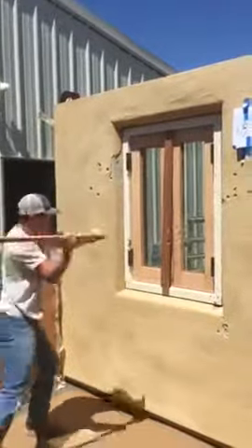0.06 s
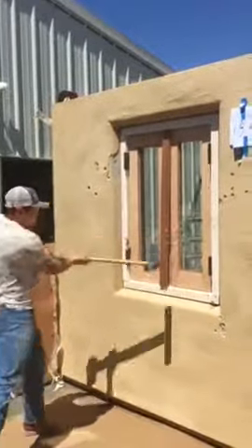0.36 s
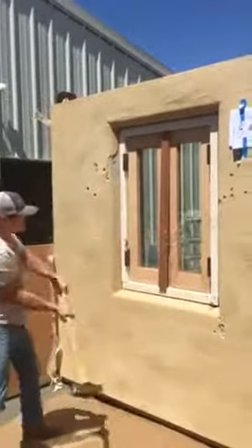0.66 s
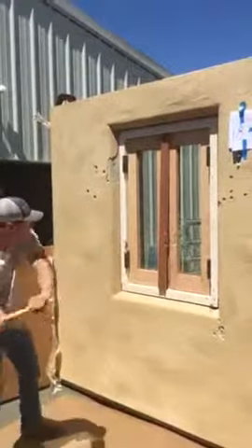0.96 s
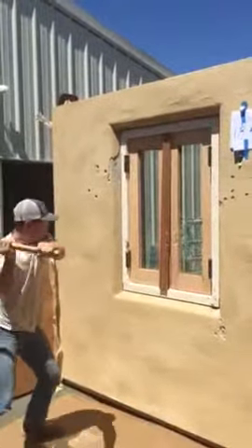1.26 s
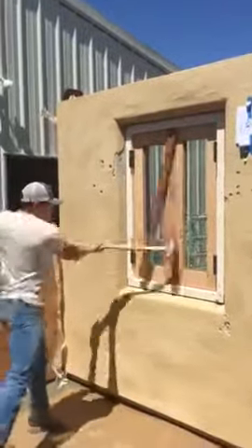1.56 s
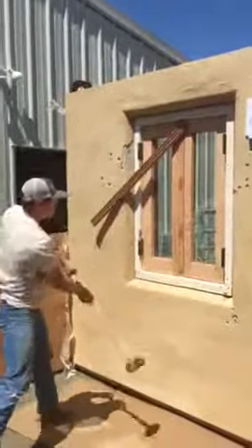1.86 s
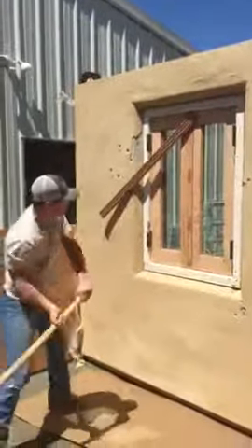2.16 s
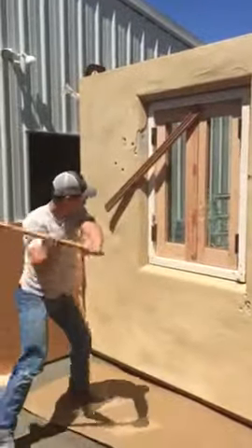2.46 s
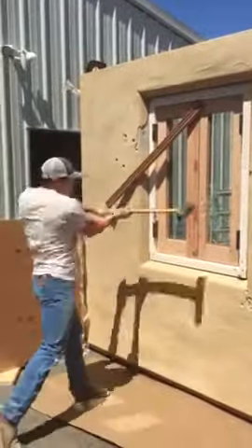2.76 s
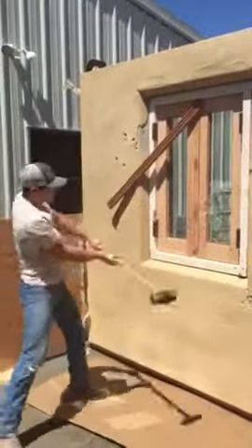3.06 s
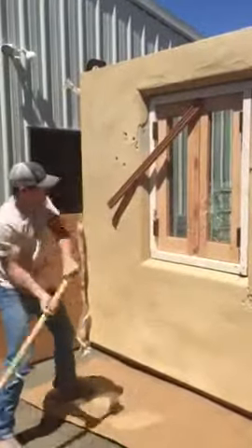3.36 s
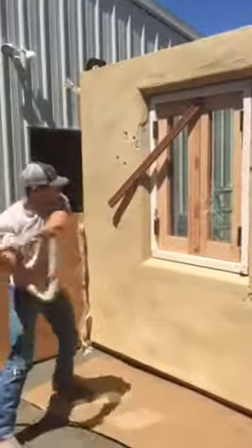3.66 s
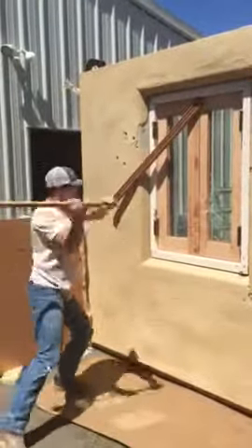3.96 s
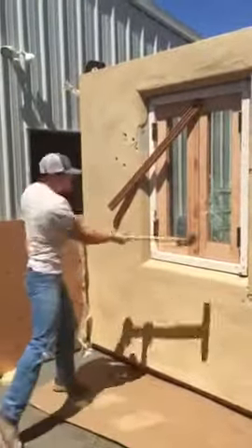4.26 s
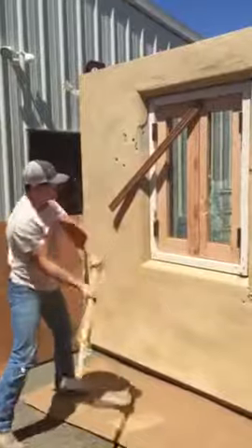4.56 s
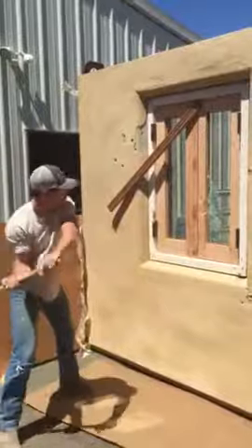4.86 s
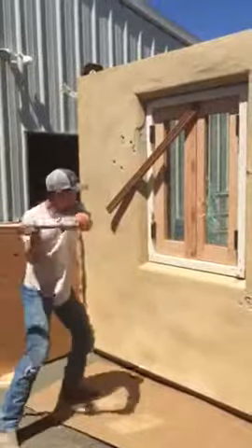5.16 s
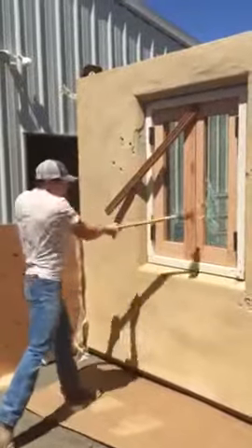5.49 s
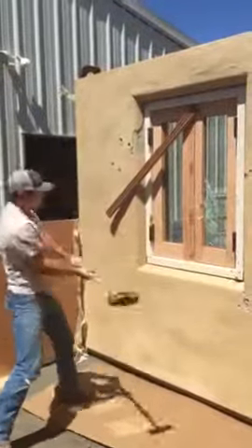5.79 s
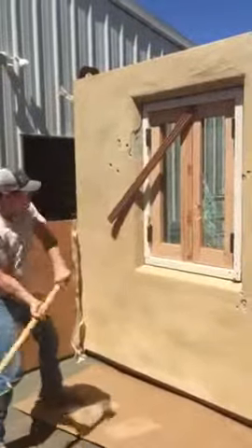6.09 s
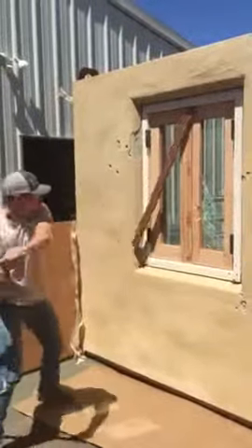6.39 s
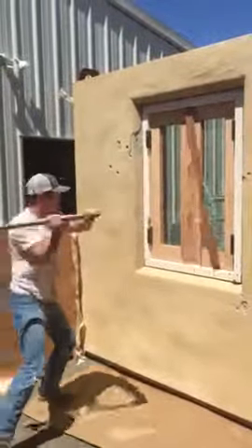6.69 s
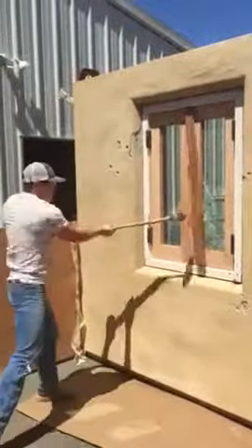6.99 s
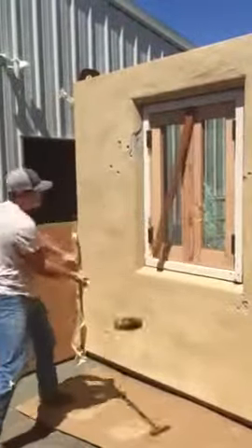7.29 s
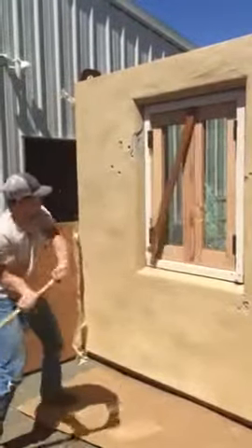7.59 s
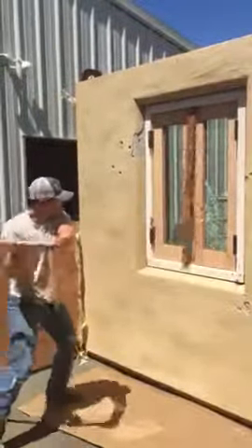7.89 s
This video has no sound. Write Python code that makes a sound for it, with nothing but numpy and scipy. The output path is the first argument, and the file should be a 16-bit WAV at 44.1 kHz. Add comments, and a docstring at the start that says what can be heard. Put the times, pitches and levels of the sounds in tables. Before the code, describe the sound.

Six heavy sledgehammer blows land on a wooden window frame, a little over a second apart, each a deep thud with a sharp crack, a short rattle and a clack of loose timber. The sound ducks for a moment after every loud hit. Shoes knock and scrape on boards and clothing rustles as the hammer is drawn back. Behind it are soft outdoor wind and a faint, far machine hum.

```python
"""Outdoors, a light wind blows, a far machine hums and shoes tap on boards. At 0.3 s a sledgehammer
hits a wooden window in a free-standing wall: the wall booms, the timber cracks, the sashes rattle.
The blow overloads the microphone, so its gain control briefly turns everything down, even wind and hum.
Clothes rustle and shoes tap and scuff between swings, and five more blows land about 1.3 s apart.
Just before the fifth, deeper tones join the hum. The last lands at 7 s; a rustle and a scuff follow."""
import sys
import numpy as np
from scipy import signal
from scipy.fft import rfft, irfft
from scipy.io import wavfile
from scipy.ndimage import minimum_filter1d

SR = 44100
rng = np.random.default_rng(int(sys.argv[2]) if len(sys.argv) > 2 else 0)


def inscribe(sig):
    """Save sig as 16-bit PCM at rate SR to the path in sys.argv[1].

    A 1-D sig is mono; a 2-D sig holds one channel per row.
    Samples are clipped to [-1, 1] before scaling.
    """
    pcm = np.round(np.clip(np.atleast_2d(sig).T, -1, 1) * 32767)
    wavfile.write(sys.argv[1], SR, pcm.astype(np.int16))


N = 350154
TIME = np.arange(N) / SR
RING_TIME = np.arange(int(.6 * SR)) / SR  # seconds since a hit

# Levels set the balance between sounds. A t60 is the time a sound takes to fade by 60 dB.
# strength of the wind on the microphone: t/s, level/dB
WIND_LEVEL = [(0, -32.5), (.3, -32.5), (.95, -41.5), (1.42, -30), (1.65, -40), (2.28, -54), (2.55, -32),
              (2.82, -26.5), (3.1, -36.5), (3.55, -31), (3.85, -33), (4.0, -43), (4.2, -31.5), (4.7, -53),
              (5.4, -39.5), (6.1, -33.5), (6.5, -45.5), (7.9, -40.5)]
# tone of the low rumble of wind and wall: f/Hz, level/dB
RUMBLE_TONE = [(20, -20.5), (35, -7), (55, 5), (85, 4), (130, -1.5), (200, -9), (320, -19.5), (800, -83)]
# slow drift of the soft outdoor noise: t/s, level/dB
OUTDOOR_LEVEL = [(0, -37), (.7, -40), (1.4, -37), (2.0, -40.5), (2.35, -40), (2.7, -37), (4.6, -37),
                 (5.3, -36), (5.9, -34.5), (6.3, -37), (7.9, -37)]
# tone of that outdoor noise: f/Hz, level/dB
OUTDOOR_TONE = [(40, -5), (100, 4), (200, 2), (420, 1), (630, 3.5), (760, 2.5), (950, 1.5), (1700, 1.5),
                (2600, -2.5), (4200, -6), (6000, -13.5), (9000, -18.5), (16000, -19)]
# tones of the far machine: start/s, f/Hz, width/Hz, level/dB
HUM_TONES = [(0, 623, 14, -51.5), (0, 565, 13, -56), (0, 920, 30, -53.5), (0, 2543, 100, -54.5),
             (5.2, 163.7, 84, -43), (5.2, 213.5, 66, -46), (5.2, 336.5, 18, -52.5)]
# swells of rustling, likely clothes: peak time/s, level/dB
RUSTLES = [(-.15, -47), (1.14, -43), (2.42, -47), (3.66, -41.5), (4.98, -41.5), (6.36, -42), (7.72, -42)]
# tone of the rustle: f/Hz, level/dB
RUSTLE_TONE = [(1500, -34), (4500, -3.5), (7000, -3), (8800, 5), (10400, -1), (12500, 2), (15200, -3.5),
               (15700, -25), (17000, -58.5)]
# shoes knocking on the boards: t/s, level/dB, added grit/dB
TAPS = [(.0958, -30.5, 5), (.1573, -34.5, 14), (1.4676, -38, 15.5), (1.62, -21.5, -15), (2.208, -19.5, -6),
        (2.2559, -9, -29), (3.4318, -22.5, 6), (3.889, -26, 1), (4.839, -15.5, -20), (4.8873, -17.5, -6),
        (5.043, -13, -0.5), (6.151, -32, 13), (6.5488, -16, -12), (6.6255, -15.5, -21)]
# heels landing with the body's weight: t/s, level/dB, f/Hz
HEELS = [(1.37, -26.5, 271), (1.4174, -25, 860), (3.68, -27, 210), (3.805, -21, 150)]
# soles scuffing over gritty boards: t/s, length/s, level/dB, f/Hz, added grit/dB
SCUFFS = [(.897, 0.11, -31.5, 1310, -20), (0.957, 0.048, -36.5, 2460, -13), (1.309, 0.079, -48.5, 2500, 12),
          (1.632, 0.03, -29, 2930, -10), (2.441, 0.062, -37, 1740, 5), (3.92, 0.069, -42, 3250, 12),
          (4.987, 0.063, -32.5, 815, 3.5), (5.458, 0.062, -42, 4600, -15),
          (7.725, 0.044, -43.5, 2460, 10.5)]
# tone of grit under a shoe: f/Hz, level/dB
GRIT_TONE = [(300, -5.5), (1200, 3.5), (2500, 2.5), (4500, 0), (7000, -4), (12000, -4), (16000, -19)]
# natural notes of wall and frame, before each blow varies them: f/Hz, level/dB, base t60/s
WALL_NOTES = [(55.3, 6.5, 0.2), (73, -4.5, 0.29), (92.4, -3, 0.48), (121.8, -2.5, 0.4), (158.5, 0, 0.24),
              (189.1, -1, 0.21), (237, -13.5, 0.2), (405.5, -20.5, 0.2), (451, -8, 0.15),
              (634.3, -9.5, 0.25), (710, -7, 0.16), (822, -8, 0.18), (919, -18.5, 0.26),
              (1042.5, -10.5, 0.24), (1197, -21, 0.22), (1382, -15, 0.29), (1700, -24, 0.078),
              (1794, -15, 0.25), (1928, -9.5, 0.12), (2415, -15, 0.16), (2817, -20.5, .17),
              (3860, -38.5, 0.074)]
# tone of the rattling sashes (the frames holding the glass) and panes: f/Hz, level/dB
RATTLE_TONE = [(60, 10), (150, 4.5), (300, 2), (650, -1), (1200, -0.5), (2000, -6.5), (3000, -9),
               (4500, -13), (8000, -17), (15000, -30.5)]
# how long the rattle lasts, with the yard's echo: f/Hz, base t60/s
RATTLE_DECAY = [(80, 0.58), (300, 0.34), (1000, 0.27), (2500, 0.32), (6000, 0.27), (14000, 0.28)]
# loose timber clacking back against the frame: t/s, level/dB
CLACKS = [(.372, -12), (.383, -20), (1.683, -25), (1.766, -18), (2.936, -23), (4.291, -14), (5.605, -11),
          (7.053, -20), (7.084, -23)]
# tone of timber splitting under steel: f/Hz, level/dB
CRACK_TONE = [(100, 17), (400, 9), (900, 5), (1900, 7.5), (3000, 0), (5000, -7), (9000, -20),
              (16000, -42.5)]
# hammer blows: t/s, boom/dB, crack/dB, rattle/dB, wall pitch factor, crack brightness/(dB per octave),
# lower timber note/Hz, upper timber note/Hz, timber level/dB
BLOWS = [(0.3229, -3.5, 1.5, 0.46, 0.97, -1.3, 957, 1780, -1.5),
         (1.6426, -5.5, 10, -0.62, 0.97, 1.6, 1650, 1890, -0.5),
         (2.8945, -4.5, -1.5, -0.5, 0.98, -0.79, 805, 1240, -5),
         (4.238, -4, -8, 0.55, 0.99, -2.4, 500, 620, -6),
         (5.5478, -4.5, 0.5, 0.22, 0.95, -1.1, 680, 1870, -4),
         (6.996, -2, -2, 0.26, 0.94, 0.2, 1100, 2070, -3.5)]


def amp(db):
    """Turns decibels into a number to multiply by."""
    return 10 ** (np.asarray(db) / 20)


def unit(x):
    """Scales a sound to an average strength (rms) of 1."""
    return x / np.sqrt(np.mean(x ** 2) + 1e-20)


def look_up(points, hz):
    """Reads a table between its rows, with octaves evenly spaced."""
    f, value = np.transpose(points)
    return np.interp(np.log(hz + 1), np.log(f + 1), value)


def colour(x, tone):
    """Shapes a sound's bass and treble with a tone table, at strength 1."""
    gain = amp(look_up(tone, np.fft.rfftfreq(len(x), 1 / SR)))
    return unit(irfft(rfft(x) * gain, len(x)))


def wander(count, hz):
    """Smooth random motion, up to about hz wiggles a second."""
    f = np.fft.rfftfreq(count, 1 / SR)
    return unit(irfft(rfft(rng.standard_normal(count)) / (1 + (f / hz) ** 4), count))


def grainy(count, clump_db, clump_hz):
    """Noise that comes in clumps."""
    return unit(rng.standard_normal(count) * amp(clump_db * wander(count, clump_hz)))


def fade(t60):
    """Dies away from 1, losing 60 dB every t60 seconds."""
    return np.exp(-np.log(1000) * RING_TIME / t60)


def resonate(x, hz, q):
    """Brings out one pitch; a higher q rings longer."""
    return signal.lfilter(*signal.iirpeak(hz, q, SR), x)


def highpass(x, edge_hz, order):
    """Cuts the bass below an edge."""
    return signal.sosfilt(signal.butter(order, edge_hz, "high", fs=SR, output="sos"), x)


def add(mix, s, sound):
    """Mixes a sound in, starting at s seconds."""
    part = mix[round(s * SR):][:len(sound)]
    part += sound[:len(part)]


def machine_hum(fade_in_s=0.078):
    """A far machine hums in faint, wavering tones; the lower ones join later."""
    out = np.zeros(N)
    for s, hz, width, db in HUM_TONES:
        fade_in = np.clip((TIME - s) / fade_in_s + 1, 0, 1)
        waver = wander(N, width / 2) + 1j * wander(N, width / 2)  # varies both loudness and pitch
        out += amp(db) * fade_in * unit((waver * np.exp(2j * np.pi * hz * TIME)).real)
    return out


def yard_echoes(x, echo_db=-10, count=14):
    """Quick echoes off walls and ground boost some pitches and weaken others."""
    delays_s = rng.uniform(0.00295, 0.045, count)
    echoes = sum(rng.choice([-1, 1]) * np.roll(x, int(s * SR)) for s in delays_s)
    return unit(x + amp(echo_db) * unit(echoes))


def wind(rumble_db=-1):
    """Gusts buffet the microphone over soft outdoor noise."""
    gusts = amp(np.interp(TIME, *np.transpose(WIND_LEVEL)))
    drift = amp(np.interp(TIME, *np.transpose(OUTDOOR_LEVEL)))
    rumble = colour(grainy(N, clump_db=3.0, clump_hz=11.6), RUMBLE_TONE)
    outdoors = colour(grainy(N, clump_db=1.36, clump_hz=39.7), OUTDOOR_TONE)
    return amp(rumble_db) * gusts * rumble + drift * yard_echoes(outdoors)


def crackle(per_s=45, size_db=3.0, t60=0.0042):
    """Scattered tiny ticks, a few of them larger."""
    clicks = (rng.random(N) < per_s / SR) * amp(size_db * np.minimum(rng.exponential(1, N), 4))
    ticks = signal.oaconvolve(clicks, fade(t60))[:N]
    return colour(ticks * rng.standard_normal(N), RUSTLE_TONE)


def rustle(still_db=-54, rise_s=0.39, fall_s=0.43, crackle_db=-6):
    """A fine, crackly hiss swells as the hammer is drawn back and sinks before it lands."""
    level = amp(still_db)
    for s, db in RUSTLES:
        width = np.where(TIME < s, rise_s, fall_s)
        level = np.hypot(level, amp(db) * np.exp(-((TIME - s) / width) ** 2))
    hiss = colour(grainy(N, clump_db=3.0, clump_hz=70.3), RUSTLE_TONE)
    return level * (hiss + amp(crackle_db) * crackle())


def board(hz, t60, q=1.17, echo_db=-20, echo_t60=0.24):
    """A floor board rings briefly and echoes off the wall."""
    knock = rng.standard_normal(len(RING_TIME)) * (fade(t60) + amp(echo_db) * fade(echo_t60))
    ring = resonate(resonate(knock, hz, q), hz, q)
    return ring / abs(ring).max()


def shoes(tap_hz=1870, tap_t60=0.032, heel_t60=0.084, scuff_q=0.74):
    """Taps and heels make the boards ring; sliding soles rub over grit."""
    out = np.zeros(N)
    for s, db, grit_db in TAPS:
        grit = colour(rng.standard_normal(len(RING_TIME)), GRIT_TONE) * fade(tap_t60)
        add(out, s, amp(db) * (board(tap_hz, tap_t60) + amp(grit_db) * grit / abs(grit).max()))
    for s, db, hz in HEELS:
        add(out, s, amp(db) * board(hz, heel_t60))
    for s, length, db, hz, grit_db in SCUFFS:
        slips = grainy(int(length * SR), clump_db=1.0, clump_hz=300)
        rub = unit(resonate(resonate(slips, hz, scuff_q), hz, scuff_q))
        rub += amp(grit_db) * colour(slips, GRIT_TONE)
        add(out, s, amp(db) * rub * signal.windows.tukey(len(rub), .7))
    return out


def shudder(level_db=-22, rise_s=0.04, t60=1.5):
    """A low rumble lingers in the wall and yard after each blow."""
    level = np.zeros(N)
    for s, *_ in BLOWS:
        age = np.maximum(TIME - s, 0)
        level += (1 - np.exp(-age / rise_s)) * np.exp(-np.log(1000) * age / t60)
    return amp(level_db) * level * colour(rng.standard_normal(N), RUMBLE_TONE)


def rattle(decay_scale=0.85, rise_s=0.007):
    """Sashes and panes chatter in the frame; the bass lasts longest."""
    chatter = colour(grainy(len(RING_TIME), clump_db=-0.5, clump_hz=220), RATTLE_TONE)
    hz, t, bands = signal.stft(chatter, SR, nperseg=256)  # split by pitch to fade each band on its own
    t60 = decay_scale * look_up(RATTLE_DECAY, hz)[:, None]
    _, faded = signal.istft(bands * np.exp(-np.log(1000) * t / t60), SR, nperseg=256)
    return faded[:len(RING_TIME)] * (1 - np.exp(-RING_TIME / rise_s))


def boom(pitch, decay_scale=0.95, spread_db=2.0, detune=0.007, rise_s=0.0053):
    """The heavy wall takes a moment to move, then rings; each spot struck mixes its notes differently."""
    swing = np.zeros(len(RING_TIME))
    for k, (hz, db, t60) in enumerate(WALL_NOTES):
        level_nudge, pitch_nudge = rng.standard_normal(2)
        note = np.sin(2 * np.pi * hz * pitch * (1 + detune * pitch_nudge) * RING_TIME)
        swing += (-1) ** k * amp(db + spread_db * level_nudge) * fade(t60 * decay_scale) * note
    return swing * (1 - np.exp(-(RING_TIME / rise_s) ** 2))


def crack(tilt_db, t60=0.031, splinter_db=-14, splinter_t60=0.17):
    """Wood fibres crush in a dense burst, then go on splintering briefly."""
    tone = [(hz, db + tilt_db * np.log2(hz / 1500)) for hz, db in CRACK_TONE]
    burst = colour(grainy(len(RING_TIME), clump_db=2, clump_hz=507), tone)
    return burst * (fade(t60) + amp(splinter_db) * fade(splinter_t60))


def snap(t60=0.0082, edge_hz=2500):
    """Steel slaps the face of the wood, short and bright."""
    tone = [(edge_hz / 6, -20), (edge_hz, 0), (9000, -11), (15000, -23), (19000, -45)]
    return colour(rng.standard_normal(len(RING_TIME)), tone) * fade(t60)


def hammer(boom_boost_db=5, crack_boost_db=11, rattle_boost_db=2, snap_db=14, timber_t60=0.21):
    """Each blow booms, snaps, cracks, rattles and rings the timber; then loose wood clacks back."""
    out = np.zeros(N)
    for s, boom_db, crack_db, rattle_db, pitch, tilt_db, lower_hz, upper_hz, timber_db in BLOWS:
        chatter = rattle()
        shake = chatter * fade(timber_t60)
        notes = sum(unit(resonate(shake, hz, q=7.4)) for hz in (lower_hz, upper_hz))
        timber = chatter.std() * unit(notes)
        add(out, s, amp(boom_boost_db + boom_db) * boom(pitch))
        add(out, s, amp(crack_boost_db + crack_db) * crack(tilt_db) + amp(snap_db) * snap())
        add(out, s, amp(rattle_boost_db + rattle_db) * chatter + amp(timber_db) * timber)
    for s, db in CLACKS:
        add(out, s, amp(db) * crack(tilt_db=0, t60=0.079))
    return out


def scene():
    """Everything that reaches the microphone, in one channel."""
    return (hammer() + shudder() + shoes() + rustle() + wind() + machine_hum())[None]


def turn_down(over_db, depth_db, hold_s, recover_db_per_s, attack_s):
    """Gain control: the volume falls on an overload, waits, and climbs back."""
    size = int(hold_s * SR)
    wanted_db = np.clip(over_db, 0, depth_db)
    held_db = -minimum_filter1d(-wanted_db, size, origin=(size - 1) // 2, mode="constant")
    climb_db = TIME * recover_db_per_s
    cut_db = np.maximum.accumulate(held_db + climb_db) - climb_db
    lag = np.exp(-1 / (attack_s * SR))
    eased_db = signal.lfilter([1 - lag], [1, -lag], cut_db)
    return amp(-np.minimum(cut_db, eased_db))


def record(dry, threshold_db=-11, treble_hz=7200, ceiling=0.59, cutoff_hz=15700):
    """Loud blows turn down the treble, then the whole sound (one long dip, one short); peaks still clip."""
    x = highpass(dry[0], edge_hz=42, order=3)
    power = signal.lfilter([1 / 200], [1, 1 / 200 - 1], x ** 2)  # averaged over about 200 samples
    over_db = 10 * np.log10(power + 1e-12) - threshold_db
    hz = np.fft.rfftfreq(N, 1 / SR)
    treble = irfft(rfft(x) / (1 + (treble_hz / (hz + 1)) ** 10), N)
    treble_gain = turn_down(over_db, depth_db=9, hold_s=0.35, recover_db_per_s=1200, attack_s=0.17)
    x = x - treble + treble * treble_gain
    x *= turn_down(over_db, depth_db=8.5, hold_s=0.35, recover_db_per_s=28.5, attack_s=0.037)
    x *= turn_down(over_db, depth_db=6.0, hold_s=0.13, recover_db_per_s=115, attack_s=0.023)
    x = x / (1 + (x / ceiling) ** 8) ** (1 / 8)  # flattens the tallest peaks
    lowpass = signal.firwin(301, cutoff_hz, window=("kaiser", 9), fs=SR)
    return signal.oaconvolve(highpass(x, edge_hz=12, order=1), lowpass, "same")[None]


dry = scene()
out = record(dry)
inscribe(out)
```